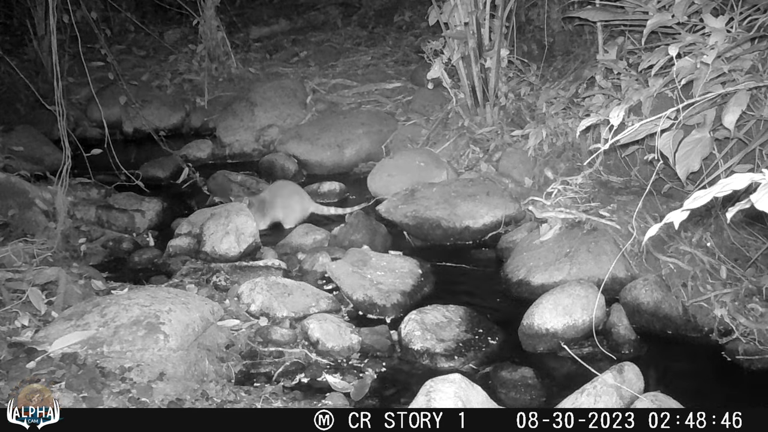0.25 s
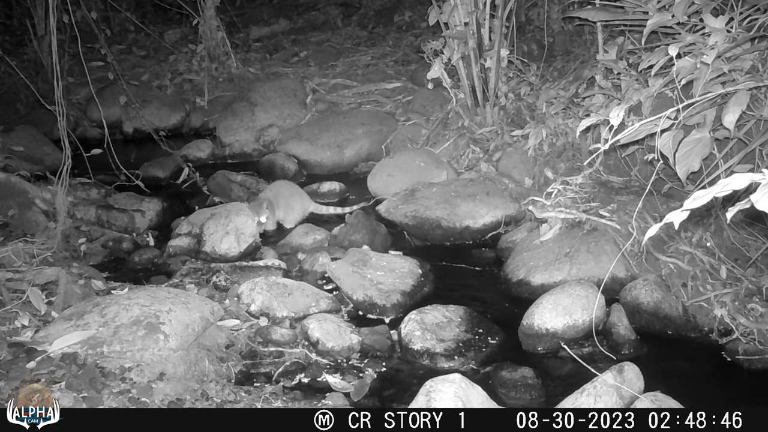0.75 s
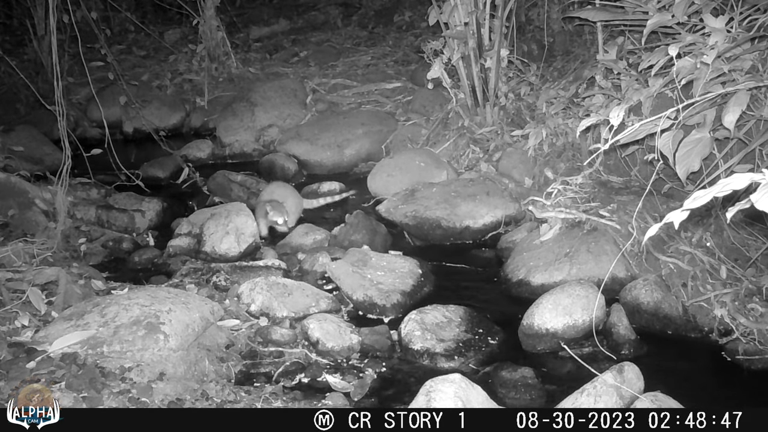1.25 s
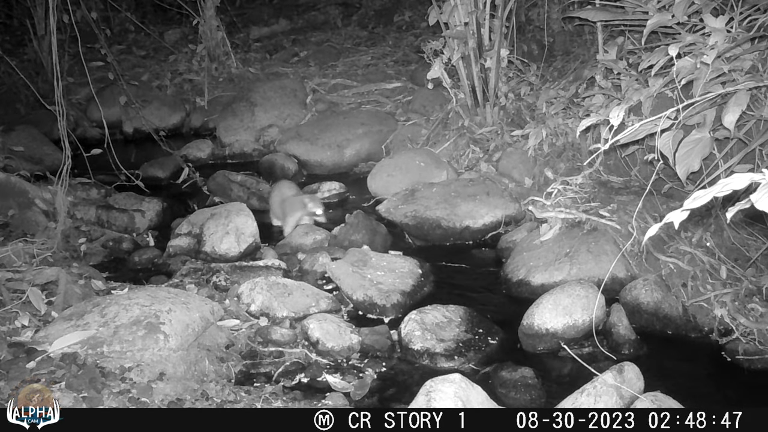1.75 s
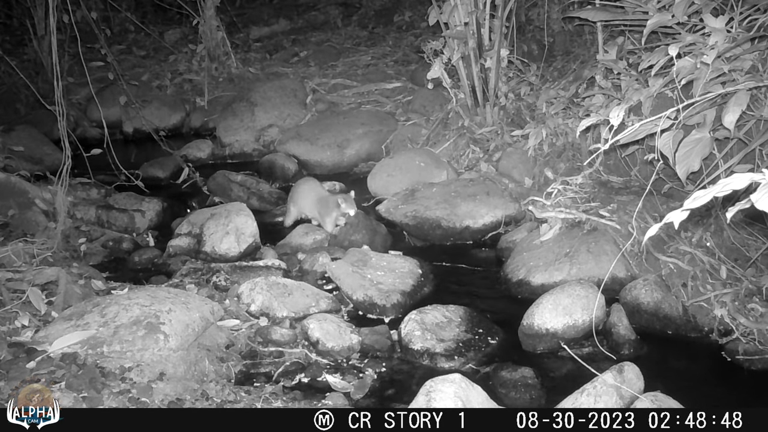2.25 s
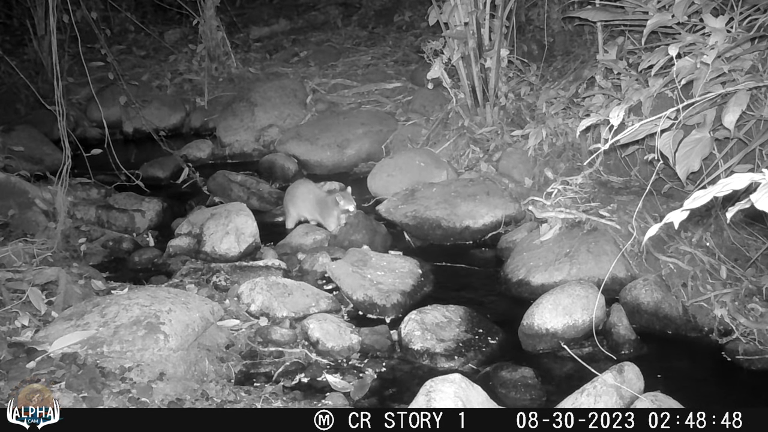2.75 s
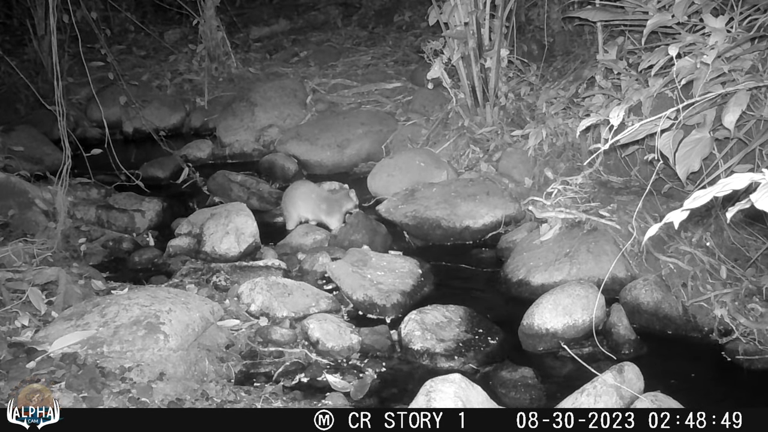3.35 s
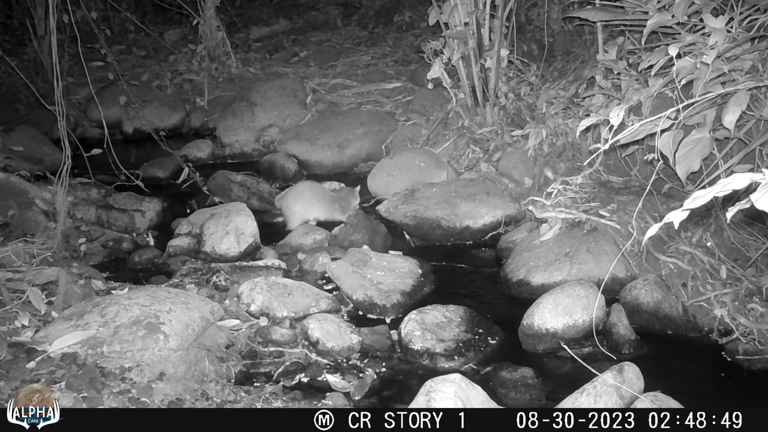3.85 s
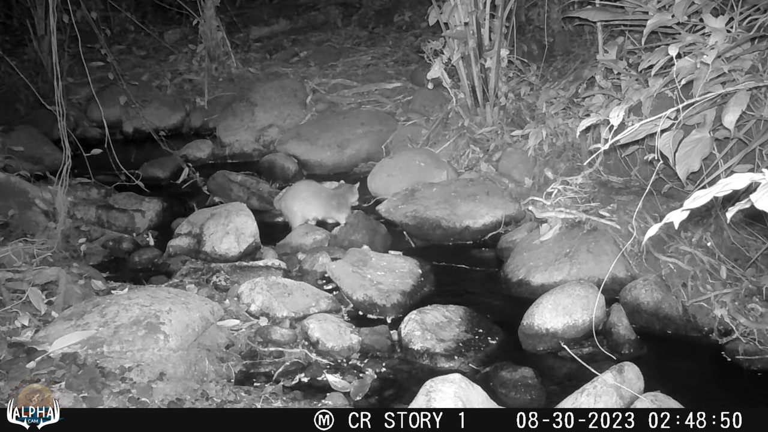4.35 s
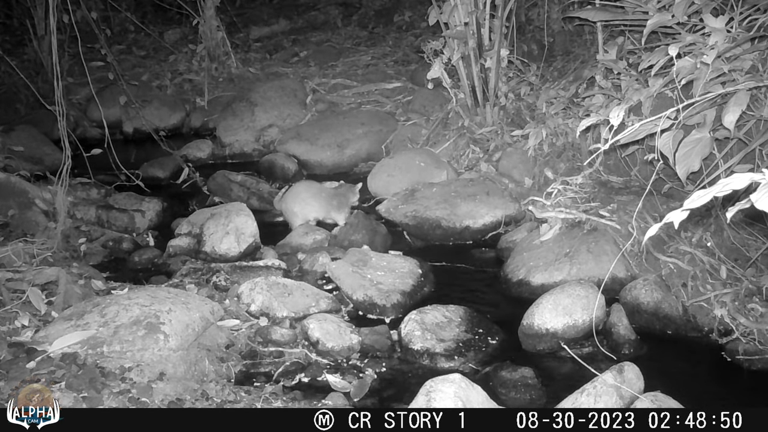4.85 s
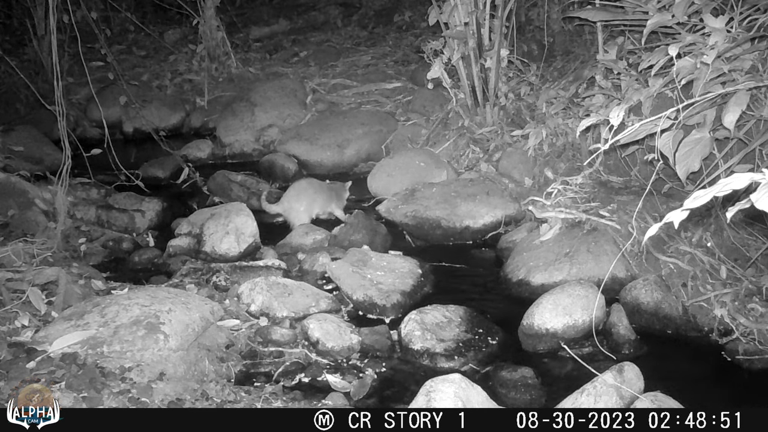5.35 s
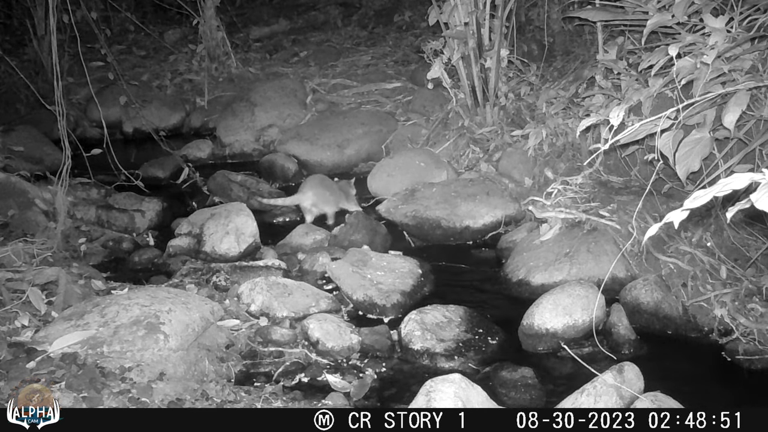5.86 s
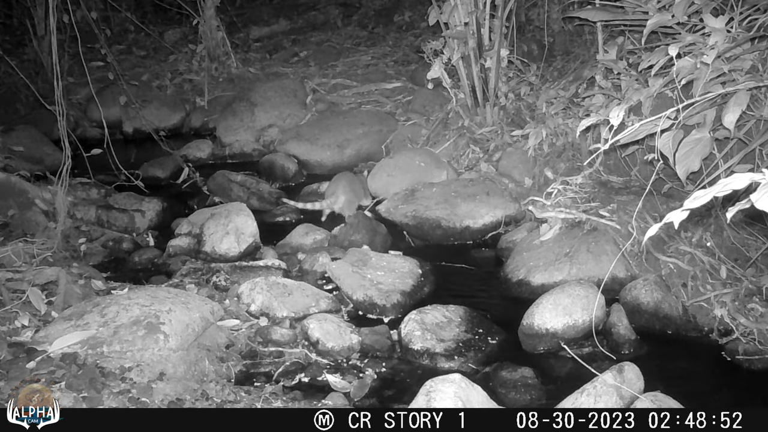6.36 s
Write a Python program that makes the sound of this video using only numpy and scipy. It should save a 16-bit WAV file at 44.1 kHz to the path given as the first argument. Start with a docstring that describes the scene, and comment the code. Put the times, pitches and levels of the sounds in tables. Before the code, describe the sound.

A small stream trickles quietly between rocks at night, with thin, high crickets and a faint low buzz from the trail camera. Almost at once the sound cuts out for half a second, then rises back in a quick run of soft clicks. The water carries on bubbling, with occasional closer plops and tiny splashes on stones, while an insect rasps faintly in an even rhythm.

```python
"""A small stream trickles between rocks at night: countless air bubbles ring over a soft wash.
Crickets trill and chirp with their wings, one insect rasps, a trail camera adds a faint buzz.
At 0.3 s the camera stops for half a second, then its amplifier wakes in eight clicking steps.
After that, near bubbles plop and water splashes on stones, with a short tail off the rocks."""
import sys
import numpy as np
from scipy import signal
from scipy.fft import rfft, irfft, next_fast_len
from scipy.io import wavfile
from scipy.ndimage import uniform_filter1d

SR = 44100
rng = np.random.default_rng(int(sys.argv[2]) if len(sys.argv) > 2 else 0)


def unload_wav(signal):
    """Save mono or channel-first audio to the path in sys.argv[1] as 16-bit WAV at rate SR, clipped to [-1, 1]."""
    wavfile.write(
        sys.argv[1],
        SR,
        np.round(np.clip(np.atleast_2d(signal).T, -1, 1) * 32767).astype(np.int16),
    )


N = 291501
TIME_S = np.arange(N) / SR

# Water spectrum: f/Hz, relative level/dB
WATER_SPECTRUM = [(60, -2.5), (150, 4.5), (300, 1.5), (470, 3), (800, -2.5), (1400, -2), (2000, -6),
                  (2800, -10), (3500, -17), (4400, -19.5), (5200, -25), (8000, -32)]
# Far insect chorus spectrum: f/Hz, relative level/dB
CHORUS_SPECTRUM = [(3000, -43.5), (5400, -31.5), (5750, -18), (6050, -11), (6500, -6), (6740, -0.5),
                   (6900, -4.5), (7100, -12.5), (7400, -14), (7800, -11.5), (8100, -20)]
# Unbroken trills: f/Hz, blur/Hz, stroke rate/Hz, level/dB
CRICKET_TRILLS = [(4944, 14, 30, -101), (4996, 16, 44, -102), (6367, 28, 48, -88), (6754, 110, 124, -83),
                  (7693, 45, 60, -92)]
# Low cricket, about every 0.8 s: peak t/s, length/s, level/dB
LOW_CRICKET_CHIRPS = [(.23, 0.073, -84), (1.533, .12, -83), (2.396, 0.29, -84), (3.09, .14, -86),
                      (3.843, 0.33, -86), (4.68, .09, -84.5), (5.547, .12, -85), (6.363, 0.18, -82.5)]
# High cricket, looser intervals: peak t/s, length/s, level/dB
HIGH_CRICKET_CHIRPS = [(0.037, .05, -74), (.25, 0.048, -72.5), (1.893, 0.069, -68.5), (2.477, 0.12, -74),
                       (3.1, 0.068, -73), (4.164, 0.086, -71), (4.577, 0.11, -74.5), (5.196, 0.098, -69.5),
                       (5.72, 0.21, -72.5), (6.518, 0.11, -70)]
# Buzz locked to the picture rate: harmonic number, level/dB
BUZZ_HARMONICS = [(2, -60), (3, -74.5), (4, -70), (5, -75), (8, -72.5), (9, -79), (10, -77.5), (14, -80.5),
                  (17, -86), (18, -84), (20, -80), (24, -83.5)]
# Electrical noise spectrum: f/Hz, relative level/dB
RUMBLE_SPECTRUM = [(8, 6), (20, 1), (45, -8), (90, -16), (200, -29), (500, -51.5), (3000, -63.5)]
# Rasp partials: f/Hz, relative level/dB
RASP_PARTIALS = [(4220, -14.5), (4385, -18), (4608, -2.5), (4790, -3), (4835, -6.5), (4945, -8)]
# Bouts of rasps: first call t/s, end t/s, relative level/dB
RASP_SCHEDULE = [(.28, .4, -86.5), (1.637, 4.2, -85.5), (4.386, 6.6, -89)]
# Amplifier gain steps: t/s
GAIN_STEPS_S = [.7903, .8906, .9962, 1.0898, 1.1904, 1.2909, 1.3912, 1.491]
# Large near bubbles: t/s, f/Hz, relative level/dB, t60/s
NEAR_BUBBLES = [(1.715, 1640, -47, .023), (1.809, 593, -47, 0.044), (1.849, 820, -56, .08),
                (1.893, 1160, -45, 0.026), (2.34, 1590, -49.5, 0.039), (2.483, 542, -47, 0.041),
                (2.504, 960, -51, 0.037), (4.137, 545, -44, 0.025), (4.298, 423.4, -52, 0.14),
                (4.314, 1170, -51, 0.044), (4.407, 2420, -43, .009), (4.408, 2970, -38, 0.0075),
                (4.46, 1052, -49, 0.056), (5.072, 302, -47.5, .15), (5.138, 965, -46, 0.028),
                (5.351, 521, -43.5, 0.052), (5.37, 560, -52.5, 0.069), (5.737, 983, -47.5, 0.044),
                (6.217, 1390, -42.5, .0088), (6.299, 1600, -48.5, 0.018)]
# Splashes on stones: peak t/s, length/s, level/dB
STONE_SPLASHES = [(1.864, .03, -65), (2.487, 0.023, -65), (3.003, .013, -60.5), (3.194, .028, -62.5),
                  (4.07, 0.066, -66.5), (4.405, 0.004, -62), (5.843, 0.06, -64.5), (6.299, 0.011, -61.5),
                  (6.402, .028, -64.5)]
# Spray filter: f/Hz, relative level/dB
SPRAY_SPECTRUM = [(300, -6), (900, 4.5), (2000, -2), (3100, -9), (4000, -20.5), (5300, -30)]


def undb(db):
    """Decibels to gain."""
    return 10 ** (np.asarray(db) / 20)


def at_rms(x, db):
    """Set the rms level."""
    return x * undb(db) / np.sqrt(np.mean(x ** 2))


def colour(x, spectrum):
    """Filter by (f/Hz, level/dB) points."""
    hz, db = np.transpose(spectrum)
    size = next_fast_len(N)
    bins_hz = np.maximum(np.fft.rfftfreq(size, 1 / SR), 1)
    gain = undb(np.interp(np.log(bins_hz), np.log(hz), db))
    return irfft(rfft(x, size) * gain, size)[:N]


def drift(rate_hz):
    """Smooth random curve, unit rms."""
    hold = max(int(SR / rate_hz), 1)
    steps = np.repeat(rng.standard_normal(N // hold + 2), hold)
    steps = steps[rng.integers(hold):][:N]
    return at_rms(uniform_filter1d(uniform_filter1d(steps, hold), hold), 0)


def add(out, start_s, sound):
    """Mix a sound in at start_s."""
    i = int(np.clip(start_s * SR, 0, N))
    out[i:i + len(sound)] += sound[:N - i]


def swells(events, skew=1.36):
    """Envelope from (t/s, length/s, level/dB) rows; each swell falls slower than it rises."""
    envelope = np.zeros(N)
    for peak_s, length_s, db in events:
        width_s = np.where(TIME_S < peak_s, length_s / skew, length_s * skew)
        envelope += undb(db) * np.exp(-2 * ((TIME_S - peak_s) / width_s) ** 2)
    return envelope


def bubble(hz, t60_s, rise):
    """A trapped air pocket rings, its pitch climbing as it nears the surface."""
    t = np.arange(int(t60_s * SR) + 2) / SR
    envelope = np.exp(-np.log(1000) * t / t60_s) * (1 - np.exp(-t * hz / 2))
    return envelope * np.sin(2 * np.pi * hz * (t + rise * t ** 2 / (2 * t60_s)))


def swarm(count, low_hz, high_hz, cycles_at_1khz, spread_db, rise):
    """Bubbles of all sizes at random times; higher ones die sooner."""
    out = np.zeros(N)
    for when, pitch, ring, force in rng.random((count, 4)):
        hz = low_hz + (high_hz - low_hz) * pitch ** 2
        t60_s = cycles_at_1khz * (.5 + ring) / np.sqrt(hz * 1000)
        offset_db = spread_db * min(-np.log(1 - force), 4)
        balance = np.sqrt((pitch + .1) / t60_s)  # about equal energy per Hz
        add(out, when * TIME_S[-1], undb(offset_db) * balance * bubble(hz, t60_s, rise * ring))
    return out


def stream(surge_db=1.0, surge_hz=11):
    """Gurgle and fine spatter over the riffle's wash, surging with the current."""
    surge = undb(surge_db * drift(surge_hz))
    gurgle = swarm(3400, low_hz=217.6, high_hz=3614, cycles_at_1khz=41.6, spread_db=3.0, rise=0.11)
    spatter = swarm(5000, low_hz=596, high_hz=3466, cycles_at_1khz=10, spread_db=1.0, rise=0.069)
    gurgle = at_rms(colour(gurgle, WATER_SPECTRUM), -68)
    spatter = at_rms(colour(spatter, WATER_SPECTRUM), -74)
    wash = at_rms(colour(rng.standard_normal(N), WATER_SPECTRUM), -64)
    return (gurgle + spatter + wash) * surge


def wing(hz, blur_hz, stroke_hz, depth=0.49):
    """A wing tone, pulsed by its strokes and blurred on its way through leaves."""
    paths = drift(blur_hz) + 1j * drift(blur_hz)
    rate_hz = stroke_hz * (1 + 0.025 * drift(3.6))
    pulses = 1 + depth * np.cos(2 * np.pi * np.cumsum(rate_hz) / SR)
    tone = np.sqrt(abs(paths)) * np.cos(2 * np.pi * hz * TIME_S + np.angle(paths))
    return at_rms(pulses * tone, 0)


def crickets():
    """A far chorus, unbroken trills and two chirping crickets on the banks."""
    chorus = at_rms(colour(rng.standard_normal(N), CHORUS_SPECTRUM), -72) * undb(0.67 * drift(8))
    trills = sum(undb(db + 2 * drift(4.6)) * wing(hz, blur_hz, stroke_hz)
                 for hz, blur_hz, stroke_hz, db in CRICKET_TRILLS)
    low = swells(LOW_CRICKET_CHIRPS) * wing(hz=5630, blur_hz=120, stroke_hz=34, depth=0.3)
    high = swells(HIGH_CRICKET_CHIRPS) * wing(hz=6780, blur_hz=110, stroke_hz=34, depth=0.28)
    return chorus + trills + low + high


def electronics(picture_hz=14.97):
    """The camera's own low buzz and rumble."""
    buzz = sum(undb(db) * np.sqrt(2) * np.sin(2 * np.pi * (k * picture_hz * TIME_S + rng.random()))
               for k, db in BUZZ_HARMONICS)
    rumble = at_rms(colour(rng.standard_normal(N), RUMBLE_SPECTRUM), -56.5)
    return buzz + rumble


def rasping_insect(period_s=0.3915, length_s=0.13):
    """Evenly paced wing rasps on a cluster of close partials."""
    calls = swells((peak_s, length_s, db) for first_s, end_s, db in RASP_SCHEDULE
                   for peak_s in np.arange(first_s, end_s, period_s))
    return calls * sum(undb(db) * wing(hz, blur_hz=36, stroke_hz=25) for hz, db in RASP_PARTIALS)


def amplifier_restart(x, stop_s=.309, awake_db=-1.5, jolt_db=-37, drain_hz=0.47, click_hz=3150):
    """Silence, then equal gain steps; each jolts the offset less than the last, clicks and drains."""
    gain = 1. * (TIME_S < stop_s)
    offset = np.zeros(N)
    count = len(GAIN_STEPS_S)
    for k, step_s in enumerate(GAIN_STEPS_S):
        stepped = TIME_S >= step_s
        gain += undb(awake_db) / count * stepped
        offset -= undb(jolt_db) * (1 - k / count) ** 1.31 * stepped
    coupling = signal.butter(1, [drain_hz, click_hz], "band", fs=SR, output="sos")
    return x * gain + signal.sosfilt(coupling, offset)


def plops(boost_db=0.5):
    """Larger bubbles ring in the nearest pools."""
    out = np.zeros(N)
    for start_s, hz, db, t60_s in NEAR_BUBBLES:
        add(out, start_s, undb(db + boost_db) * bubble(hz, t60_s, rise=0.027))
    return out


def rocks(x, t60_s=0.18, onset_s=0.018, wet_db=-13):
    """Boulders and banks scatter a short tail."""
    t = TIME_S[:SR // 3]
    envelope = np.exp(-np.log(1000) * t / t60_s) * (1 - np.exp(-t / onset_s))
    tail = rng.standard_normal(len(t)) * envelope
    return x + undb(wet_db) * signal.fftconvolve(x, tail / np.linalg.norm(tail))[:N]


def splashes():
    """Water slaps a stone and throws a brief shower of droplets."""
    droplets = swarm(6000, low_hz=460, high_hz=4440, cycles_at_1khz=6.3, spread_db=-3.5, rise=0.041)
    return at_rms(colour(droplets, SPRAY_SPECTRUM), 0) * swells(STONE_SPLASHES)


def scene():
    """Water, insects and buzz in one channel."""
    water = stream() + rocks(plops() + splashes())
    return (water + crickets() + rasping_insect() + electronics())[None]


def record(dry, cutoff_hz=8000):
    """The camera's stop and restart, then a steep low-pass."""
    lowpass = signal.ellip(10, .2, 70, cutoff_hz, fs=SR, output="sos")
    return signal.sosfilt(lowpass, amplifier_restart(dry))


dry = scene()
out = record(dry)
unload_wav(out)
```